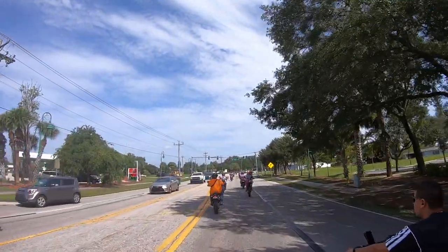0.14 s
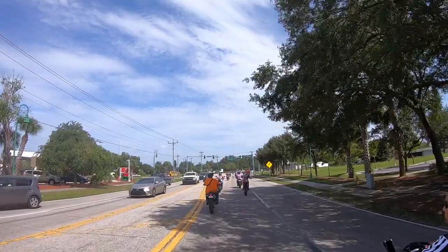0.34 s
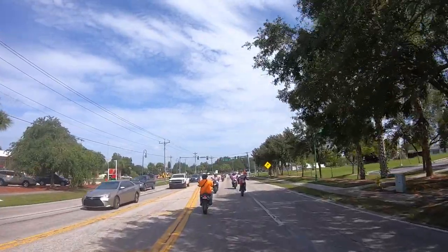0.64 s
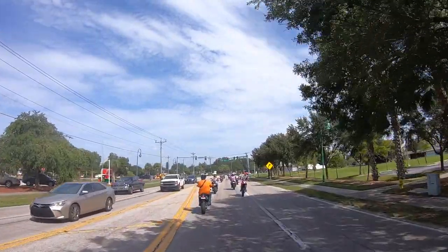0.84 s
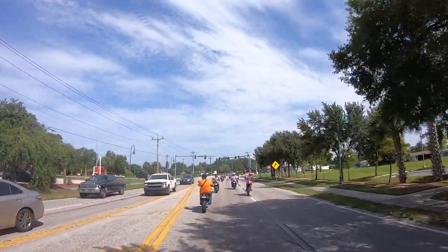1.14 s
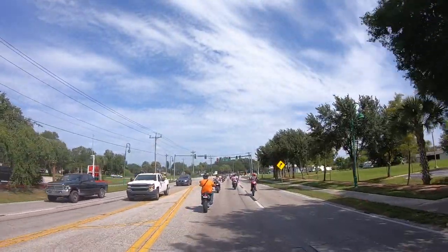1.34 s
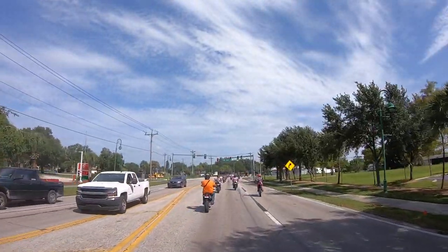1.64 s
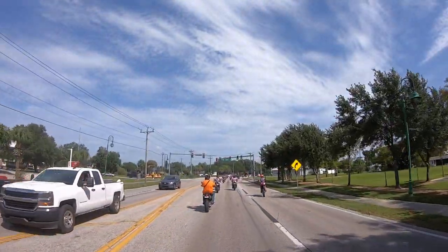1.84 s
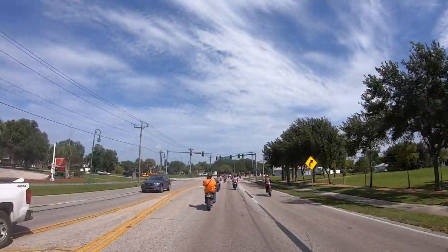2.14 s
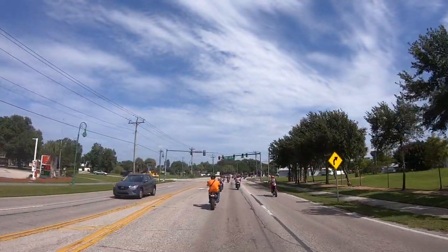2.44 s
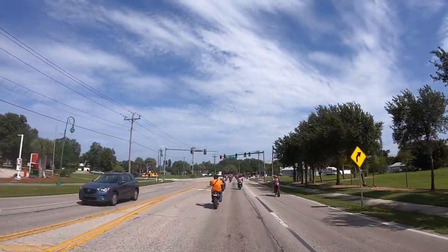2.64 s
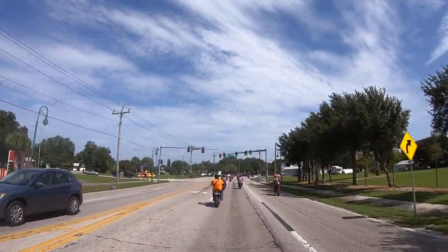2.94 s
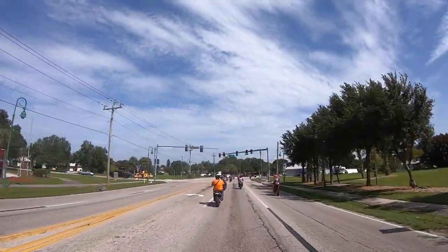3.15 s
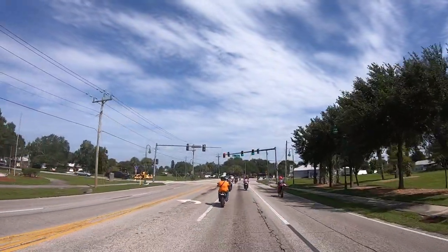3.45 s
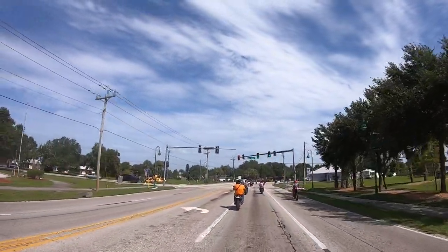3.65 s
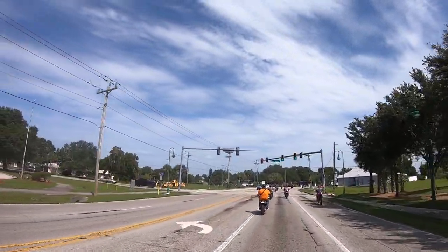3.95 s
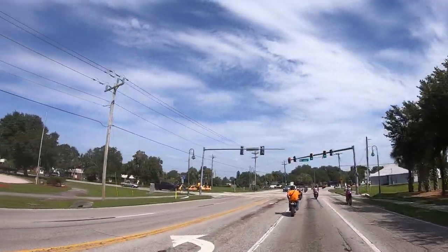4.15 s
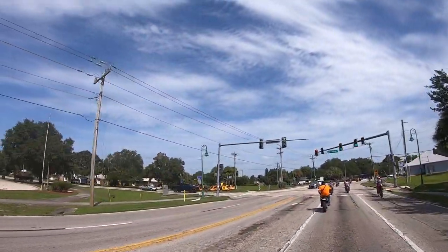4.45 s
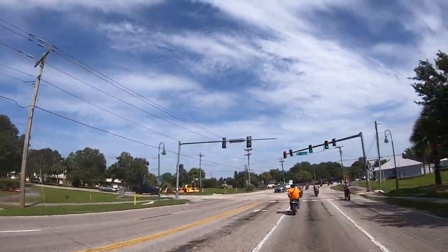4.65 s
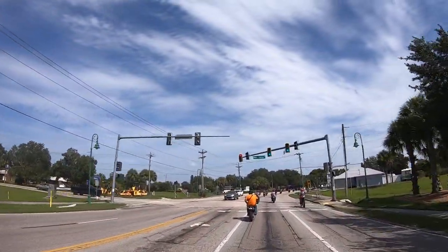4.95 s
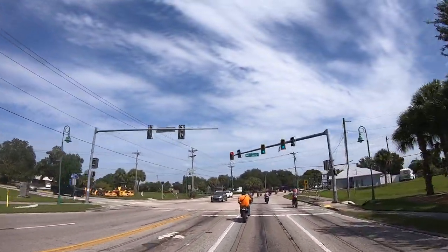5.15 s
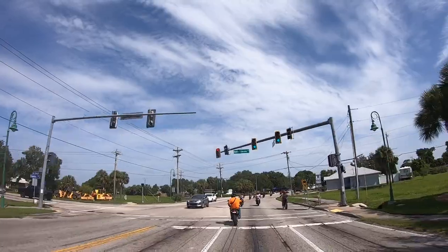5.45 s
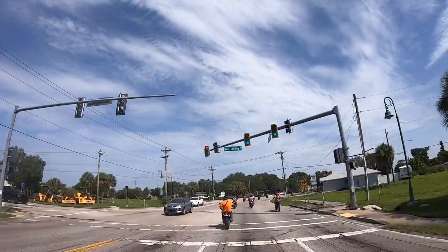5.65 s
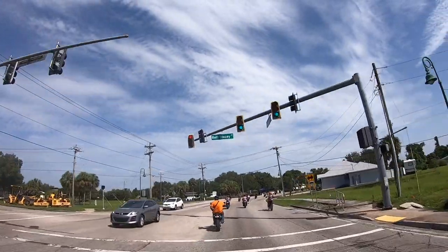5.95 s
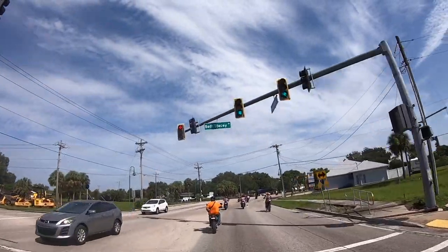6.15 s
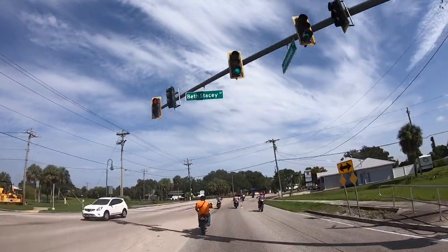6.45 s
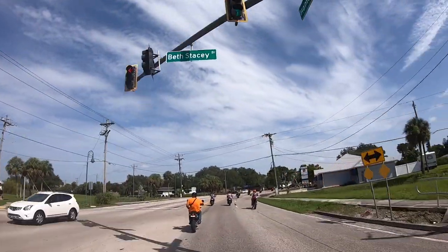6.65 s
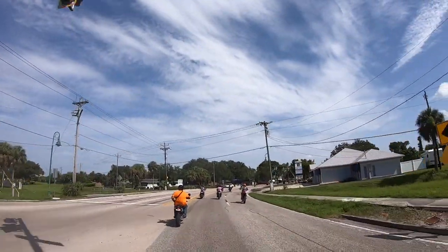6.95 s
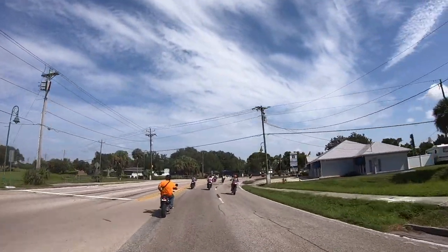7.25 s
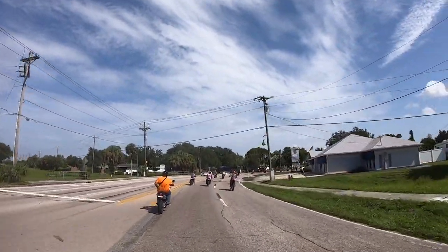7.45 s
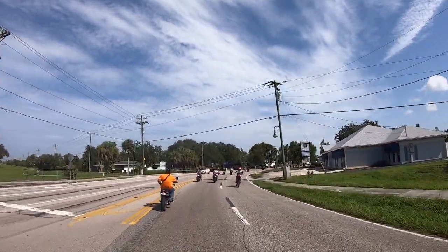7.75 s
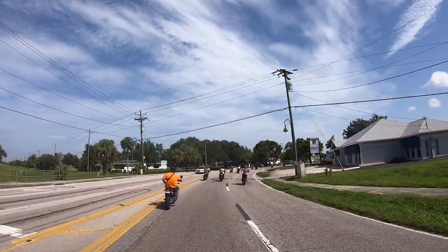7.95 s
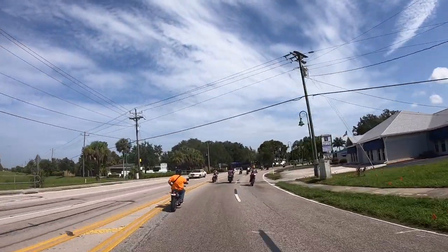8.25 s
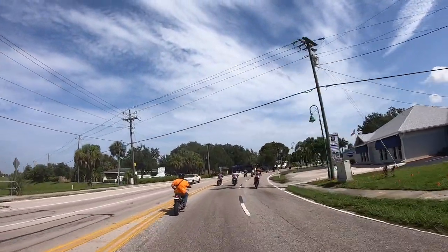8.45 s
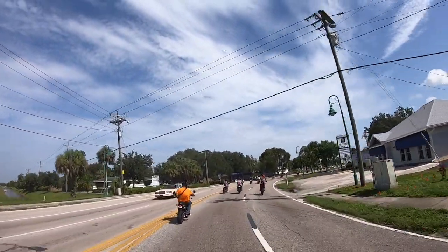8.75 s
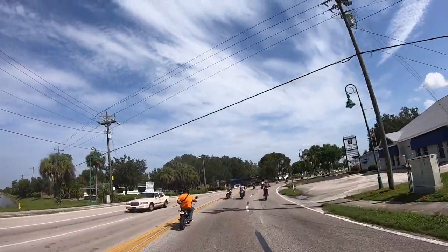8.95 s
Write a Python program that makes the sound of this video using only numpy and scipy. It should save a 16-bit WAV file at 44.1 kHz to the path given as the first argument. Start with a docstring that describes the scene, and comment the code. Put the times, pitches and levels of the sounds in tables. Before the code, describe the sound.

Close, low exhaust thumps run throughout, heard from a microphone on the bike. First a neighbouring bike snarls and a faint hum fades; around three seconds traffic rushes by. Hard throttle brings bright metallic cracks and a rising note to just past five seconds, then a quick pitch drop, a rough sputtering overrun with pops, and a gentle return of power, over road roar and wind.

```python
"""On the road, aboard a single-cylinder motorcycle in a group. Each firing sends a pulse through its exhaust:
it thumps, cracks under throttle, drops at a gear change and pops unevenly on the overrun (throttle closed).
A second bike alongside pulls through two gears, its uneven pulses ringing in its pipe. A hum and a thin hiss
fade, made of sine tones and filtered noise. A truck passes the other way, and wind, distant engines and tyres
roar under it all: these are shaped noise."""
import sys
import numpy as np
from scipy import signal
from scipy.fft import rfft, irfft, next_fast_len
from scipy.io import wavfile
from scipy.ndimage import uniform_filter1d, minimum_filter1d, map_coordinates

SR = 44100
rng = np.random.default_rng(int(sys.argv[2]) if len(sys.argv) > 2 else 0)


def int16_out(signal):
    """Quantize to a 16-bit WAV file."""
    q = np.round(np.clip(np.atleast_2d(signal).T, -1, 1) * 32767)
    wavfile.write(sys.argv[1], SR, q.astype(np.int16))


N = 401297
TIME = np.arange(N) / SR  # seconds

# A blow leaves the pipe, then returns after each round trip: list of delays [s]
TRIPS = [.0021, .0062, .0099, .0135, .0171]
# The crack swells in surges while pulling: peak_s, rise_db
SURGES = [(3.44, 5), (3.54, 6.5), (3.63, 13), (3.721, 10.5), (3.83, 6), (3.95, 5), (4.071, 8), (4.19, 6.5),
          (4.315, 7.5), (4.42, 3), (4.545, 4), (4.66, 6), (4.78, 4.5), (4.92, 3)]
SURGE_HALF_S = 0.037
# Tone of a sharp crack from the exhaust: pitch_hz, gain_db
BARK = [(400, -25.5), (830, -20.5), (980, -2.5), (1090, -4), (1200, -2), (1380, 5), (1510, 2), (1660, -5),
        (1770, 0), (1900, -0.5), (2030, -0.5), (2180, -4), (2360, -7), (2450, -10.5), (2700, -16.5),
        (2850, -8.5), (3300, -13), (3800, -22.5), (5300, -29.5), (6300, -48.5), (8200, -48), (11000, -64.5),
        (16500, -91.5)]


def amp(db):
    """Turns decibels into a multiplier."""
    return 10 ** (np.asarray(db) / 20)


def unit(x):
    """Scales a sound to an average strength (rms) of 1."""
    return x / np.sqrt(np.mean(x ** 2) + 1e-20)


def curves(rows):
    """Joins table points with straight lines: one curve for each column after the time."""
    s, *cols = np.transpose(rows)
    return [np.interp(TIME, s, c) for c in cols]


def bump(t, peak_s, half_s):
    """A smooth hill of height 1 that falls to 1/e at half_s from its peak."""
    return np.exp(-((t - peak_s) / half_s) ** 2)


def wobble(rate):
    """A smooth random curve through `rate` random points a second."""
    points = rng.standard_normal(int(N * rate / SR) + 4)
    return map_coordinates(points, [np.arange(N) * rate / SR])


def filtered(x, response):
    """Multiplies each frequency of x by a response, which may also shift its phase."""
    m = next_fast_len(N + SR // 2)
    return irfft(rfft(x, m) * response(np.fft.rfftfreq(m, 1 / SR)), m)[..., :N]


def colour(points):
    """Makes a tone filter from (pitch_hz, gain_db) points joined on a log pitch scale."""
    f, db = np.transpose(points)
    return lambda hz: amp(np.interp(np.log(hz + 1), np.log(f + 1), db))


def causal(points):
    """The same tone filter with minimum phase, so that a pulse starts sharply."""
    def response(hz):
        cep = irfft(np.log(colour(points)(hz) + 1e-6))
        cep[1:len(cep) // 2] *= 2
        cep[len(cep) // 2 + 1:] = 0
        return np.exp(rfft(cep))
    return response


def tube(modes, muffle_hz):
    """Steep resonances that build up softly (each mode acts three times) behind a silencer."""
    def response(f):
        rings = 0
        for centre, width, db in modes:
            once = 1j * f * width / (centre * centre - f * f + 1j * f * width)
            rings = rings + amp(db) * once ** 3
        return rings / (1 + 1j * f / muffle_hz) ** 4
    return response


def firings(cycles, jitter_s, uneven_db):
    """One pulse wherever the cycle count passes a whole number, each a little off in time and size."""
    at = np.flatnonzero(np.diff(np.floor(cycles)))
    luck = rng.standard_normal((len(at), 2))
    size = amp(np.broadcast_to(uneven_db, N)[at] * luck[:, 0])
    shift = np.round(np.broadcast_to(jitter_s, N)[at] * SR * luck[:, 1]).astype(int)
    return np.bincount(np.clip(at + shift, 0, N - 1), size, N)


def puffs(pulses, t60):
    """Turbulent noise after each pulse, dying by 60 dB in t60 seconds and cut off at 0.05 s."""
    t = np.arange(SR // 20) / SR
    return signal.fftconvolve(pulses, amp(-60 * t / t60))[:N] * rng.standard_normal(N)


def rush(spectrum, patchy_db):
    """Noise of rms 1 whose gain varies in random patches of time and pitch."""
    z = signal.stft(rng.standard_normal(N), nperseg=512)[2]
    patches = uniform_filter1d(rng.standard_normal(z.shape), 6, 0)
    patches = unit(uniform_filter1d(patches, 10, 1))
    noise = signal.istft(z * amp(patchy_db * patches), nperseg=512)[1][:N]
    return unit(filtered(noise, colour(spectrum)))


def leaning(x, lean, pivot_hz, wander=0):
    """Tips the tone about a pivot pitch: positive lean is brighter, negative is duller."""
    tilted = filtered(x, lambda f: np.tanh(2 * np.log((f + 1) / pivot_hz)))
    return x + np.clip(curves(lean)[0] + wander, -1, 1) * tilted


def own_bike():
    """Each firing sends a blow into the pipe; the crank, turning twice a firing, hums."""
    # Engine speed before the surges jerk it: start_s, firings_per_s
    firing = [(0.0, 31.78), (0.8, 33.32), (1.6, 34.16), (1.8, 34.61), (3.0, 35.95), (3.2, 35.9),
              (4.6, 40.22), (4.97, 42.06), (5.11, 44.26), (5.17, 44.78), (5.2, 48.3), (5.22, 45.2),
              (5.24, 41.5), (5.26, 44.81), (5.39, 36.15), (5.67, 37.29), (5.75, 35.84), (6.35, 35.86),
              (6.55, 34.63), (6.95, 34.16), (7.95, 32.18), (8.15, 33.82), (8.35, 32.32), (9.1, 32.81)]
    # Levels before small random wavers: start_s, thump_db, upper_part_over_thump_db, crank_hum_db
    exhaust = [(0, -13, -10.5, -45), (1.1, -13.5, -12, -27.5), (2.36, -13.5, -14, -15.5),
               (2.61, -18, -12.5, -18.5), (3.1, -13, -19.5, -19), (3.6, -13.5, -14.5, -18.5),
               (4.5, -13, -14, -19), (5.09, -13.5, -9.5, -18), (5.3, -15, -13.5, -21.5),
               (5.67, -13.5, -9, -21.5), (6, -24.5, -15, -21), (6.12, -19.5, -13.5, -16),
               (6.28, -13.5, -10.5, -19.5), (6.42, -18, -13.5, -17), (6.7, -16, -20.5, -19.5),
               (6.89, -17, -26, -22), (7.2, -17.5, -18.5, -17.5), (7.5, -16, -21, -16),
               (7.8, -18, -20, -15.5), (8.11, -19, -16.5, -14), (8.54, -14.5, -13, -22.5),
               (9.1, -12.5, -16.5, -19.5)]
    # Throttle: start_s, opening (0-1)
    throttle = [(0, .5), (2.9, .5), (3.35, 1), (5.7, 1), (5.9, 0), (7.35, 0), (7.45, .25), (8.2, .25),
                (8.4, .7), (9.1, .7)]
    # What the throttle sets: opening (0-1), firing_scatter_db, then five relative sizes, one per arrival
    returns = [(0, 1.3, -.1, -1, -.2, 0, 0), (.25, 1.3, .6, 1, .4, .1, .1), (.5, .75, .55, 1, .08, .1, .2),
               (.7, .6, .65, 1, .18, .3, .2), (1, .5, .67, 1, .45, .08, .1)]
    # Weak and heavy firings on the overrun: thump_s, change_db
    stumbles = [(6.174, -7), (6.362, -9.5), (6.507, 3), (6.592, -4), (6.738, 0.5), (6.766, 4),
                (7.028, -3.5), (7.147, 7), (7.175, -6.5), (7.294, -10.5), (7.355, -4.5), (7.45, -0.5),
                (7.54, -5.5), (7.567, -5), (7.693, -15.5), (7.724, -6.5), (7.754, -10.5), (7.783, 6.5),
                (7.813, -4.5), (7.843, 2), (7.935, -2), (7.997, 9.5), (8.027, -3.5), (8.178, -6)]

    rate = curves(firing)[0]
    cycles = np.cumsum(rate) / SR - .22 + .006 * rate  # counted at the valve, a little before the thump peaks
    snatch, snatch_lag_s = .018, .03  # each surge jerks the crank ahead (share of a cycle), just after its peak
    cycles = cycles + sum(snatch * bump(TIME, s + snatch_lag_s, SURGE_HALF_S) for s, _ in SURGES)

    opening, *settings = np.transpose(returns)
    throttle_now = curves(throttle)[0]
    uneven_db, *sizes = (np.interp(throttle_now, opening, column) for column in settings)
    blows = firings(cycles, .00004 * uneven_db ** 2, uneven_db)  # rough firing is also ill-timed
    thump_at = TIME + TRIPS[2]
    blows = blows * amp(sum(db * (abs(thump_at - s) < .013) for s, db in stumbles))

    thump_db, upper_db, crank_db = curves(exhaust)
    hum_phase = 4 * np.pi * cycles + 2.0 + 0.18 * wobble(17)
    hum = amp(crank_db + 0.46 * wobble(3.6)) * np.sin(hum_phase)
    thump = exhaust_thump(blows, sizes, uneven_db, upper_db)
    return amp(thump_db) * thump + hum + exhaust_crack(blows, thump_at, uneven_db)


def exhaust_thump(blows, sizes, uneven_db, upper_db):
    """Each blow runs back and forth in the pipe, so several copies arrive and merge into a deep thump."""
    # Main and upper parts of a blow's tone: pitch_hz, gain_db
    pipe = [(40, -120), (70, -36), (110, -5.5), (160, -2), (210, 1), (270, -0.5), (330, -0.5), (400, -26.5),
            (520, -68.5), (800, -120)]
    upper = [(200, -120), (300, -41.5), (375, -6.5), (425, 17), (470, 16.5), (515, 8.5), (560, -4.5),
             (600, -7), (640, -2.5), (900, -71.5), (1400, -120)]
    # The main part leans deeper (-1) or higher (+1), before random wander: start_s, lean
    thump_lean = [(0, -0.14), (3, 0.45), (5.7, -0.097), (6.2, -1.5), (6.7, -1.2), (7.1, -0.54),
                  (7.401, 0.6), (8.1, 0.82), (8.499, 0.98), (9.1, 0.64)]

    gas = unit(blows) + .05 * unit(puffs(blows, t60=.03))
    sizes = sizes / np.linalg.norm(sizes, axis=0)
    train = sum(np.roll(size * gas, round(s * SR)) for s, size in zip(TRIPS, sizes))
    low, high = (unit(filtered(train, colour(lobe))) for lobe in (pipe, upper))
    wander = 0.87 * np.clip(uneven_db - .5, 0, 1) * wobble(20)  # rough firing wavers in tone
    return leaning(low, thump_lean, pivot_hz=247, wander=wander) + amp(upper_db) * high


def exhaust_crack(blows, thump_at, uneven_db):
    """A shock in the pipe cracks and trails turbulence; a stronger shock is steeper, so brighter."""
    # Levels (crack before surges, treble before steepness): start_s, crack_db, treble_db, knock_db
    crack_levels = [(0, -47, 0, -63.5), (3.25, -52.5, -6, -64), (3.44, -37, -3, -42),
                    (3.6, -43.5, -9.5, -52), (3.8, -37.5, 3, -40.5), (4.15, -34.5, -7, -65),
                    (4.25, -36, -9.5, -39), (4.42, -30, -2, -46), (4.6, -32, -2, -56),
                    (4.75, -29.5, -9, -49), (4.97, -28, -3.5, -52), (5.06, -27, 2, -39),
                    (5.16, -31, 6.5, -44), (5.2, -37.5, 3.5, -54), (5.29, -42.5, 2, -51),
                    (5.4, -33.5, 2.5, -40), (5.5, -30, 2.5, -36), (5.62, -31, 7, -31),
                    (5.68, -31.5, 4.5, -34), (5.75, -37.5, -2, -45), (5.85, -47.5, -6, -58),
                    (6.3, -40.5, -15, -56), (7.2, -42, -3, -67), (7.6, -44, 5, -64), (8.2, -49.5, 0, -56),
                    (8.35, -37.5, 7, -49), (8.5, -47, -7, -44), (8.75, -42, -3, -46), (9.1, -41, -4, -50)]
    # The shock runs up and down the pipe: gain (multiplier), delay_s
    pipe_echo = [(1, 0), (.3, .00394), (.12, .00788)]
    # Hot gas spitting after the crack: pitch_hz, gain_db
    spit_tone = [(2500, -61.5), (3600, 3), (4800, 0.5), (5500, -5.5), (6300, -15.5), (8300, -13),
                 (9500, -23), (11500, -28.5), (16500, -67.5)]
    # Modes of the pipe that the crack knocks, the silencer's shell, and high pipe modes that a
    # steep shock wakes: pitch_hz, width_hz (of one pass), relative_db
    knock_modes = [(630, 580, 0)]
    shell_modes = [(1416, 300, 2.5), (1770, 340, -1.5), (2026, 130, -3)]
    sizzle_modes = [(2320, 290, 0), (2617, 200, 2.5), (3080, 350, 2), (3570, 250, -1.5)]
    # High modes relative to the crack: start_s, level_db
    sizzling = [(0, -20), (3.6, -20), (4.3, -23), (4.7, -19.5), (4.95, -16), (5.05, -4), (5.17, -3.5),
                (5.3, -16), (5.6, -10), (5.8, -19.5), (9.1, -21)]

    def echoes(f):
        return sum(g * np.exp(-2j * np.pi * f * s) for g, s in pipe_echo)

    turbulence = puffs(np.roll(blows, round(0.00063 * SR)), t60=0.036)  # trails the shock
    crack = unit(filtered(blows, echoes)) + 0.5 * unit(turbulence)
    crack = unit(filtered(crack, causal(BARK)))
    dull = filtered(crack, lambda f: 1 / (1 + 1j * f / 2600) ** 2)

    crack_db, treble_db, knock_db = curves(crack_levels)
    crack_db = crack_db + sum(db * bump(thump_at, s, SURGE_HALF_S) for s, db in SURGES)
    crack_db += (uneven_db - .35) * wobble(30)  # rough firing crackles
    steep = np.clip((crack_db + 42) / 14, 0, 1.4)
    bright = steep * amp(treble_db)

    spit = puffs(np.roll(blows, round(0.0022 * SR)), t60=0.019)  # 2.2 ms later
    spit = unit(filtered(spit, colour(spit_tone)))
    edge = crack - dull + amp(-24) * bright * spit
    knock = unit(filtered(blows, tube(knock_modes, muffle_hz=3000)))
    # The silencer's shell rattles on between cracks
    rattle = unit(filtered(puffs(blows, t60=0.15), tube(shell_modes, muffle_hz=9000)))
    sizzle = unit(blows) + .5 * unit(puffs(blows, t60=0.032))
    sizzle = unit(filtered(sizzle, tube(sizzle_modes, muffle_hz=9000)))
    body = dull + amp(-16) * rattle + amp(curves(sizzling)[0]) * sizzle
    return amp(knock_db) * knock + amp(crack_db) * (body + bright * edge)


def second_bike():
    """Four uneven blows a cycle: clear pipe tones below, a snarl and a blurred rasp under load."""
    # Levels: start_s, drone_db, snarl_db
    beside = [(0, -43, -74), (.3, -26.5, -35.5), (.45, -35, -38), (.55, -23, -30.5), (.63, -32.5, -39),
              (.7, -24.5, -30), (.79, -30, -32.5), (.86, -38, -41), (1.1, -23.5, -38.5), (1.2, -30, -46),
              (1.75, -29.5, -52), (2.1, -27.5, -47), (2.3, -23, -40.5), (2.45, -29.5, -36.5),
              (2.55, -23, -32.5), (2.79, -23, -31), (2.99, -26, -37), (3.06, -35, -44.5), (3.3, -65.5, -50),
              (3.6, -87, -75)]
    # Engine speed: start_s, cycles_per_s
    beside_rate = [(0, 35), (.25, 35.7), (.44, 37.1), (.48, 35.1), (.85, 38.2), (1.1, 28), (1.8, 31.1),
                   (2.15, 33.4), (2.88, 40), (3.01, 41), (3.3, 36)]
    # Blows in one cycle: share_of_cycle, relative_size (before random scatter)
    cylinders = [(0, 1), (.242, .5), (.484, .2), (.726, .1)]
    # Low pipe modes, then upper ones under load: pitch_hz, width_hz (of one pass), relative_db
    drone_modes = [(454, 110, -2), (597, 150, -3)]
    snarl_modes = [(807, 140, -8), (903, 72, -4), (1007, 96, 0), (1116, 93, -2.5), (1249, 80, -3.5),
                   (1428, 170, -2.5), (1676, 68, -4.5), (1900, 150, -11.5), (2010, 47, -14.5),
                   (2320, 110, -4.5), (2512, 120, -3.5)]
    # Tone of the rasp: pitch_hz, gain_db
    rasp_tone = [(400, -57), (800, 4), (1050, -2), (1450, -1), (2000, -5.5), (2500, -9.5), (3200, -13.5),
                 (4500, -23), (5500, -36.5), (6500, -43.5), (7800, -38), (10000, -39.5), (13000, -53.5),
                 (16500, -110)]

    drone_db, snarl_db = curves(beside)
    cycles = np.cumsum(curves(beside_rate)[0]) / SR
    blows = sum(size * firings(cycles - share, .00003, 1.2) for share, size in cylinders)
    # Road and traffic scatter each blow on its way
    scatter_t60_s = 0.098
    scatter = rng.standard_normal(SR // 20) * amp(-60 * np.arange(SR // 20) / SR / scatter_t60_s)
    spread = signal.fftconvolve(blows, scatter)[:N]
    drone = unit(filtered(spread, tube(drone_modes, muffle_hz=3980)))
    snarl = unit(filtered(spread, tube(snarl_modes, muffle_hz=3980)))
    rasp = unit(filtered(puffs(blows, t60=0.073), colour(rasp_tone)))
    rasp_db = -36.5 + 0.32 * (snarl_db + 33)  # grows 0.32 dB per dB of snarl
    return amp(drone_db) * drone + amp(snarl_db) * snarl + amp(rasp_db) * rasp


def fading_hum():
    """Three overtones of a steady hum nearby, faded after half a second."""
    # Base pitch (itself not sounded), and level before a random waver: start_s, pitch_hz, level_db
    whine = [(0, 150.2, -27.5), (.3, 151.2, -30), (.45, 158.7, -31.5), (.55, 152, -64)]
    hz, db = curves(whine)
    turn = 2 * np.pi * np.cumsum(hz) / SR
    overtones = amp(3.5) * np.sin(3 * turn) + np.sin(4 * turn) + amp(-5) * np.sin(5 * turn)
    return amp(db + 2 * wobble(20)) * overtones


def air():
    """Wind buffets the microphone; the pack's distant engines roar; tyres and hiss swell as traffic nears."""
    # Levels before random gusts: start_s, buffet_db, roar_db
    air_levels = [(0, -31.5, -17.5), (.5, -23, -17), (.85, -33, -16), (2.38, -30, -18), (2.76, -31, -17.5),
                  (3.5, -31.5, -18), (5, -28, -23.5), (5.64, -32, -20), (6.1, -26, -18), (6.5, -31, -19.5),
                  (7, -31, -18), (7.3, -28, -17), (7.67, -19.5, -17.5), (8.25, -31, -15), (8.62, -32, -19),
                  (9.1, -29.5, -17)]
    # Tones of the four noises: pitch_hz, gain_db
    buffet_tone = [(8.8, -44), (15, -10), (37, 1), (54, -0.5), (70, 1), (91, -29), (150, -120)]
    roar_tone = [(29, -36.5), (50, -8.5), (81, -2), (120, -2.5), (180, -0.5), (245, -5), (305, -4.5),
                 (360, -13), (600, -22), (800, -54), (1300, -120)]
    tyre_tone = [(200, -41), (400, 0.5), (600, -4), (900, -9.5), (1300, -16.5), (2000, -28), (3000, -61.5)]
    hiss_tone = [(750, -57), (1500, 3.5), (2200, -1.5), (3300, -3.5), (4200, -9), (5100, -13),
                 (5800, -20.5), (7000, -21), (8500, -25.5), (10000, -33.5), (12500, -68.5), (15000, -84),
                 (16500, -110)]
    # The roar leans deeper (-1) or higher (+1): start_s, lean
    roar_lean = [(0, 0.26), (1.5, 0.22), (2.699, -0.18), (5, 0.13), (6.2, -0.086), (7, -0.12),
                 (8.2, -0.051), (9.1, -0.19)]
    # Traffic drawing near: peak_s, half_width_s, tyres_up_db, hiss_up_db
    swells = [(0.701, 0.12, 8, 0.5), (2.58, 0.062, 1.5, 3.5), (2.898, 0.24, 5.5, 7.5),
              (5.271, 0.085, 2, 2.5), (5.5, 0.62, 0, 2), (7.098, 1, 2.5, 4), (8.3, 0.18, 3.5, 3),
              (8.8, 0.58, -1, -1.5)]

    buffet_db, roar_db = curves(air_levels)
    tyres_db = -34.5 + sum(up * bump(TIME, s, half) for s, half, up, _ in swells)
    hiss_db = -47 + sum(up * bump(TIME, s, half) for s, half, _, up in swells)
    gust = wobble(6.6)
    roar = leaning(rush(roar_tone, patchy_db=0.47), roar_lean, pivot_hz=149)
    return (amp(buffet_db + 1.3 * wobble(12.0)) * rush(buffet_tone, patchy_db=1)
            + amp(roar_db + 1.3 * gust) * roar
            + amp(tyres_db + 0.82 * gust) * rush(tyre_tone, patchy_db=1.16)
            + amp(hiss_db + 0.24 * gust + 1.5 * wobble(30)) * rush(hiss_tone, patchy_db=1.2))


def thin_hiss():
    """A faint, narrow band of noise very high up, flickering at random and fading away."""
    # Level before the flicker: start_s, level_db
    thin = [(0, -81), (.3, -81), (.77, -82), (1.1, -80), (1.25, -75), (1.37, -73.5), (2, -80), (3.2, -90.5),
            (9.1, -110)]
    # Tone: pitch_hz, gain_db
    thin_band = [(10500, -29), (11700, -8), (12200, -1), (12700, -5), (13800, -19), (15500, -51.5)]
    return amp(curves(thin)[0] + 3 * wobble(14)) * rush(thin_band, patchy_db=1)


def truck():
    """The dense wash of tyres and air from a truck going the other way, as shaped noise."""
    # Level before the lean: start_s, level_db
    wash = [(0, -72.5), (2.4, -56.5), (2.5, -34.5), (2.62, -31), (2.75, -39.5), (2.85, -33), (3, -50.5),
            (3.25, -42), (3.4, -65), (9.1, -71.5)]
    # Tone: pitch_hz, gain_db
    truck_tone = [(700, -50.5), (1200, 3), (1700, 3.5), (2500, -2.5), (3300, -11), (4500, -23.5),
                  (6500, -34.5), (8000, -29), (11000, -41.5), (16500, -100)]
    # Brighter (+) while it comes, duller (-) as it goes: start_s, lean
    truck_lean = [(0, 0.28), (2.5, 0.32), (2.65, .2), (2.85, -.2), (3.2, -.2), (9.1, -.2)]
    noise = leaning(rush(truck_tone, patchy_db=1.1), truck_lean, pivot_hz=1700)
    return amp(curves(wash)[0]) * noise


def pops():
    """Unburnt fuel lights in the pipe: lone cracks with a duller puff and a short ring."""
    # Overrun pops, strength relative to one another: start_s, strength_db
    pop_hits = [(6.2466, -22.5), (6.2743, -27.5), (6.305, -22), (6.565, -22), (6.673, -22), (6.759, -16.5),
                (6.88, -26), (7.1434, -14), (7.265, -22), (7.4158, -22.5), (8.0007, -38)]
    # What a pop rings in the pipe: pitch_hz, width_hz (of one pass), relative_db
    pop_body = [(300, 200, 6), (720, 250, -10), (1450, 300, -13)]
    puff_tone = [(300, -31.0), (600, 2.5), (1500, -7), (3000, -15.5), (8000, -39.5), (16000, -85.5)]  # Hz, dB

    hits = np.zeros(N)
    for s, db in pop_hits:
        hits[round(s * SR)] = amp(db)
    peak = np.abs(filtered(np.arange(N) == 0, causal(BARK))).max()  # height of a single crack
    crack = filtered(hits, causal(BARK)) / peak
    puff = filtered(puffs(hits, t60=0.032), colour(puff_tone))
    ring = filtered(hits, tube(pop_body, muffle_hz=4000))
    return amp(26.0) * ring + 0.41 * crack + 4.2 * puff


def scene():
    """Adds all sources at one microphone."""
    bikes = own_bike() + second_bike()
    return (bikes + fading_hum() + air() + thin_hiss() + truck() + pops())[None]


def record(dry):
    """A limiter holds the peaks down; nothing passes from 15.7 kHz up."""
    need = np.minimum(1, .72 / (np.abs(dry) + 1e-9)) ** .8  # firm, not a hard wall
    gain = uniform_filter1d(minimum_filter1d(need, size=221), size=221)  # about 5 ms windows
    return filtered(dry * gain, lambda hz: hz < 15700)


dry = scene()
out = record(dry)
int16_out(out)
```